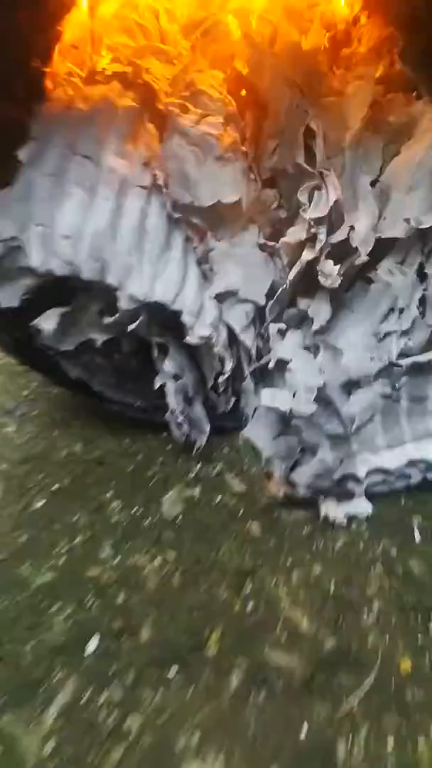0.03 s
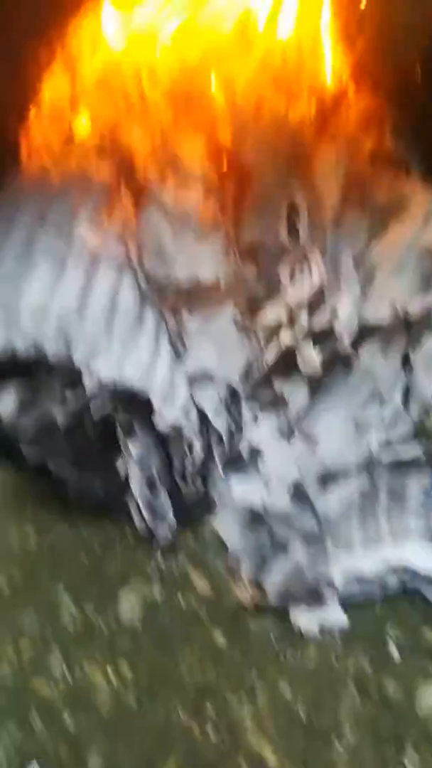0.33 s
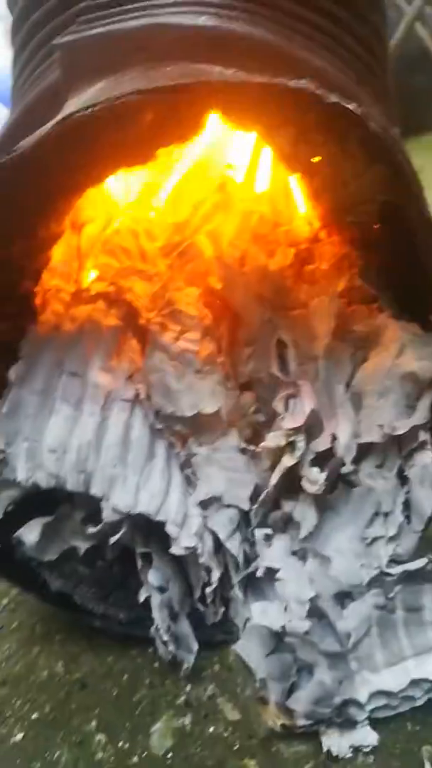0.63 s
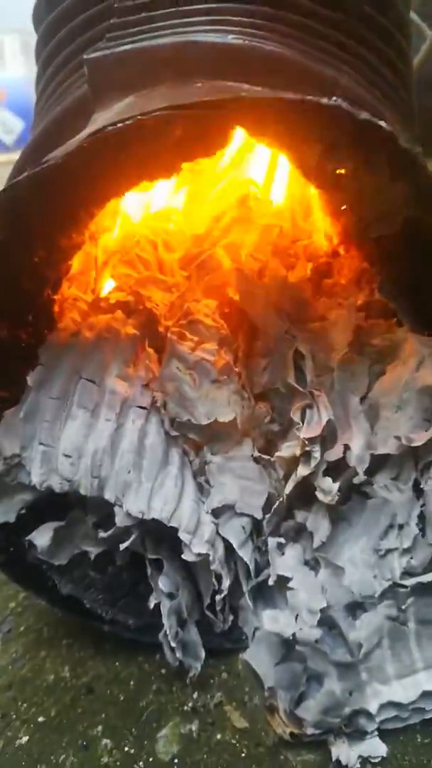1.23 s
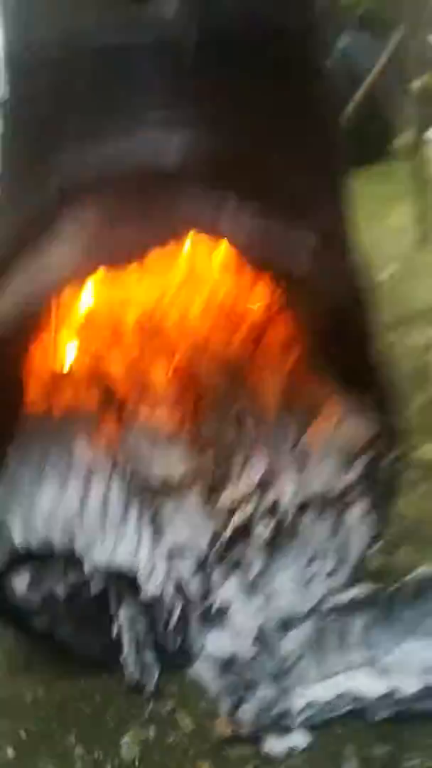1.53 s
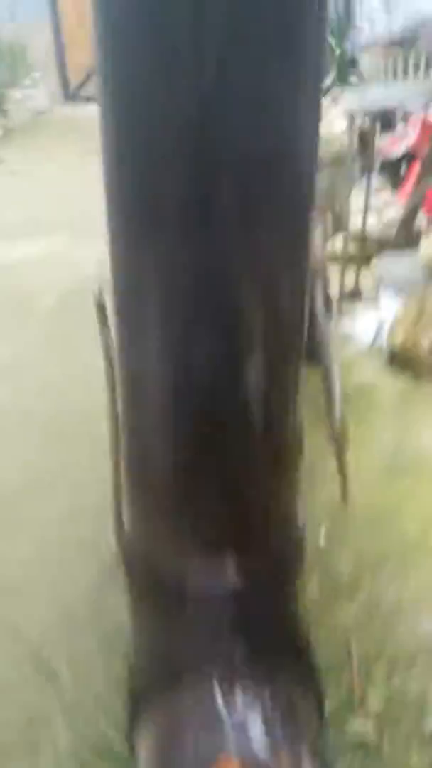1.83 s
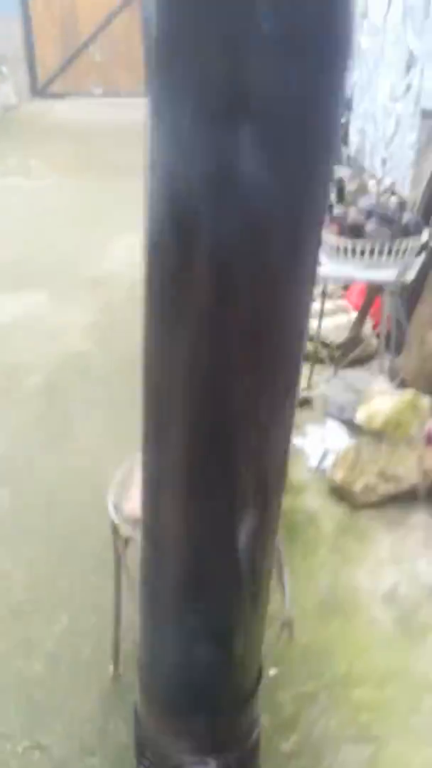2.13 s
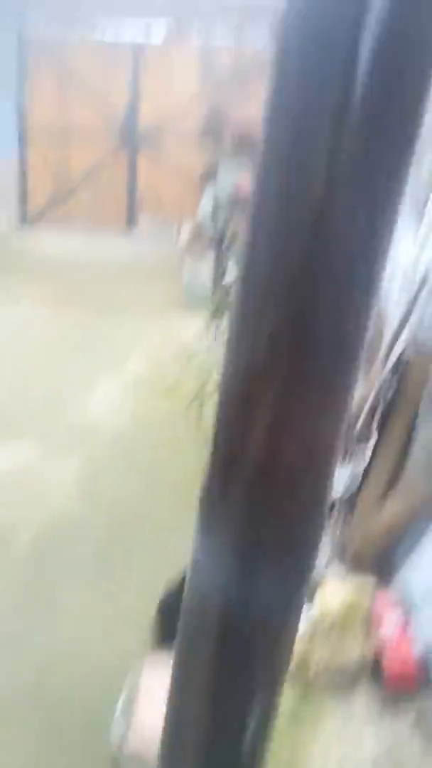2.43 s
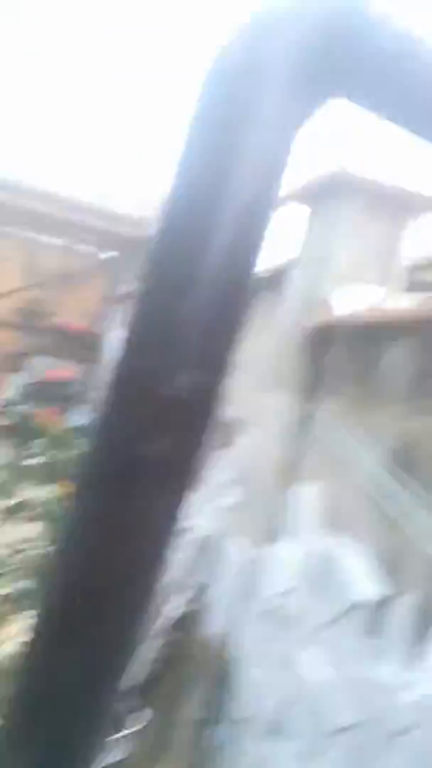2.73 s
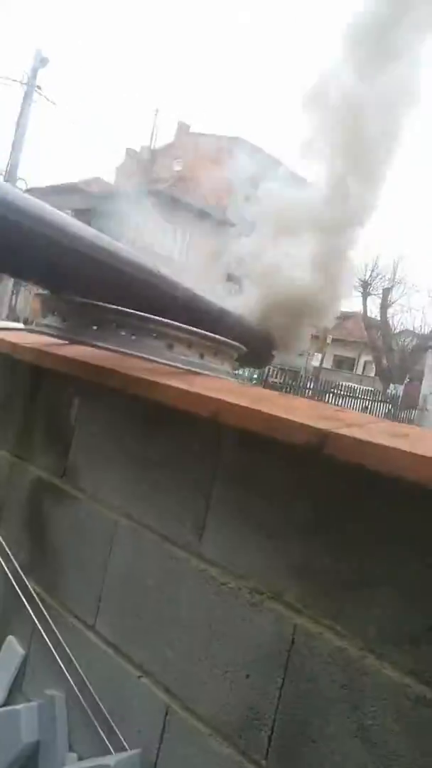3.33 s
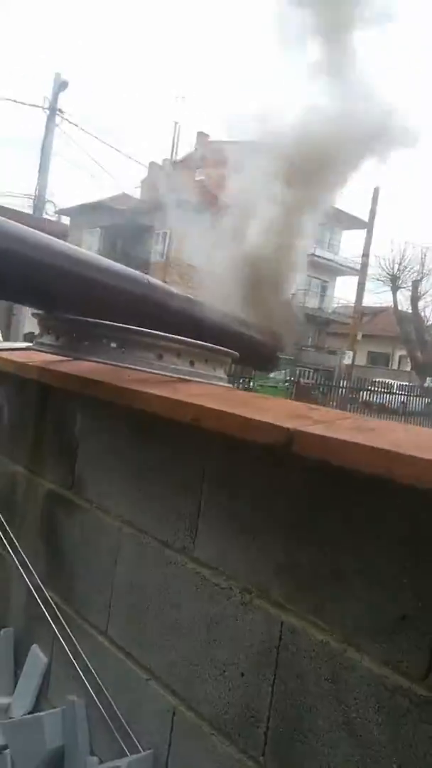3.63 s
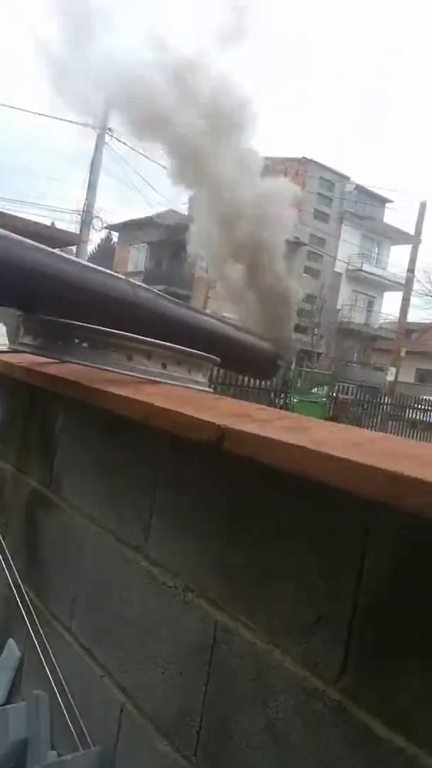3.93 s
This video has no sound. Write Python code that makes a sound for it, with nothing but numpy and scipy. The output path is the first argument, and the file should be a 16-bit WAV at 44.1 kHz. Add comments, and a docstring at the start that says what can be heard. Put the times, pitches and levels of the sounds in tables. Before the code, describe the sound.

Paper fire rumbling and crackling in a metal stovepipe outdoors, fading under clothing rustle.

```python
"""Paper burns in the mouth of a long stovepipe in a yard. The draught makes the pipe rumble in its
air modes, flames flutter and the paper crackles. A person with the microphone turns away along the
pipe, so the rumble fades; clothes rustle and a shoe scuffs the ground. A distant town lies under it.
The left microphone port is muffled and hears the fire and the movement a little late."""
import sys
import numpy as np
from scipy import signal
from scipy.io import wavfile
from scipy.ndimage import uniform_filter1d

SR = 44100
rng = np.random.default_rng(int(sys.argv[2]) if len(sys.argv) > 2 else 0)


def output_pcm(signal):
    """Save a mono or channel-first signal as 16-bit PCM at the path in sys.argv[1].

    Samples are clipped to [-1, 1] before scaling.
    """
    pcm = np.clip(np.atleast_2d(signal).T, -1, 1) * 32767
    wavfile.write(sys.argv[1], SR, np.round(pcm).astype(np.int16))


N = 176400
T = np.arange(N) / SR


def from_db(db):
    """Decibels to gain."""
    return 10 ** (np.asarray(db) / 20)


def unit_rms(x):
    """Scale to rms 1."""
    return x / np.sqrt(np.mean(x ** 2) + 1e-20)


def gain_curve(rows):
    """Gain along (seconds, dB) points."""
    return from_db(np.interp(T, *np.transpose(rows)))


def delayed(x, delay_s):
    """Fractional delay."""
    return np.interp(T - delay_s, T, x, left=0)


def drift(rate_hz):
    """Smooth random wander, rms 1."""
    step, settle = 40, 2000
    pole = np.exp(-2 * np.pi * rate_hz * step / SR)
    white = rng.standard_normal(N // step + settle + 2)
    slow = signal.lfilter([1], [1, -2 * pole, pole * pole], white)[settle:]
    return np.interp(np.arange(N) / step, np.arange(len(slow)), unit_rms(slow))


def band(x, low_hz, high_hz):
    """Butterworth band-pass."""
    edges_hz = [low_hz, min(high_hz, .45 * SR)]
    return signal.sosfilt(signal.butter(2, edges_hz, "band", fs=SR, output="sos"), x)


def resonate(x, hz, width_hz):
    """Two-pole resonance, peak gain 1."""
    r = np.exp(-np.pi * width_hz / SR)
    feedback = [1, -2 * r * np.cos(2 * np.pi * hz / SR), r * r]
    return signal.lfilter(np.array([1, 0, -1]) * (1 - r * r) / 2, feedback, x + 1e-18)


def coloured_noise(spectrum, flicker_db, flicker_hz=12):
    """Third-octave noise bands, each flickering on its own; rms 1."""
    hz, db = np.transpose(spectrum)
    edges_hz = 18 * 2 ** (np.arange(31) / 3)
    white, out = rng.standard_normal((2, N)), 0
    for k, (low, high) in enumerate(zip(edges_hz, edges_hz[1:])):
        wander_db = flicker_db * drift(flicker_hz)
        if high > hz[0] and low < hz[-1]:
            band_db = np.interp(np.log(np.sqrt(low * high)), np.log(hz), db)
            out = out + from_db(band_db + wander_db) * band(white[k % 2], low, high)
    return unit_rms(out)


def steadied(x, window_s=0.086, amount=0.55):
    """Even out part of the level swings; rms 1."""
    power = np.abs(uniform_filter1d(x * x, int(window_s * SR))) + 1e-20
    return unit_rms(x / power ** (amount / 2))


# Low rumble, and upper roar, which fades faster away from the mouth.
# Each row: time in seconds, relative level in dB.
DRAUGHT_LEVEL = [(0, -39.5), (.4, -47.5), (.95, -43), (1.7, -45), (1.79, -55), (1.9, -48), (2.2, -51.5),
                 (2.45, -52.5), (2.8, -57), (3.05, -57), (3.11, -65), (3.22, -54), (3.33, -66),
                 (3.45, -59.5), (3.7, -61.5), (4, -57.5)]
ROAR_LEVEL = [(0, -50), (.5, -54.5), (.75, -51), (1.07, -56), (1.45, -50.5), (1.65, -52.5), (1.75, -59.5),
              (1.95, -61), (2.1, -68.5), (2.45, -77.5), (2.7, -74.5), (3.35, -78), (3.65, -76), (4, -70)]
# Fire surges and sinks. Each row: centre in seconds, half length in seconds, boosts in dB for
# mode 1 with the turbulence, for mode 2, for the higher modes.
FIRE_SURGES = [(0.079, 0.015, 6, 7, 9.5), (0.118, 0.02, 7, -1, 7), (0.304, 0.052, 9, -5, 7.5),
               (0.37, 0.028, -5, -7, 4), (0.464, 0.026, 7, 9, 4), (0.619, 0.041, 1.5, 1, 4.5),
               (0.678, 0.023, 4, 7.5, 5.5), (.825, 0.018, 11.5, 6, 4.5), (0.883, 0.017, -10, 0, 6.5),
               (1.006, 0.012, -16, 9, 7), (1.126, 0.021, 3, 7.5, 8.5), (1.203, 0.028, 2.5, 1, 10.5),
               (1.228, 0.019, 6.5, -2.5, 1), (1.369, .03, 3, 2, 12), (1.528, 0.022, 3, 9.5, 7.5),
               (1.663, 0.058, 6, 2.5, -1), (2.143, 0.046, 7, -15, -1), (2.294, 0.042, 5.5, -11, 1),
               (2.418, 0.083, 0, 8, 10), (2.64, .025, 3, 0.5, -11), (3.024, 0.079, 5, -3, 2.5),
               (3.526, 0.016, 0, 17, 10), (3.951, 0.021, 8, 1, 2)]
# Each row: frequency in Hz, relative density in dB.
TURBULENCE_SPECTRUM = [(20, -4), (45, -4.5), (100, -8.5), (200, -15), (350, -21), (500, -30), (900, -47)]
# Each row: frequency in Hz, width in Hz, relative level in dB, share 0-1 that follows the roar.
AIR_MODES = [(63.66, 12.9, -2.5, 0.17), (143.2, 11.3, 1, 0.84), (220.5, 25, -1.5, 1), (298.4, 14.2, -4, 1),
             (364.7, 57, -12.5, 0.61)]


def pipe():
    """Turbulent burning drives the pipe's air modes, harder with each surge."""
    draught, roar = gain_curve(DRAUGHT_LEVEL), gain_curve(ROAR_LEVEL)
    surge_db = sum(np.outer(boosts_db, np.exp(-((T - centre_s) / half_s) ** 2))
                   for centre_s, half_s, *boosts_db in FIRE_SURGES)
    turbulence = coloured_noise(TURBULENCE_SPECTRUM, flicker_db=-1)
    out = from_db(surge_db[0] - 8.5) * draught * turbulence
    for k, (hz, width_hz, db, share) in enumerate(AIR_MODES):
        ring = resonate(rng.standard_normal(N), hz, width_hz)
        mode = steadied(resonate(ring, hz, 3.5 * width_hz))  # second pass steepens the skirts
        envelope = draught ** (1 - share) * roar ** share
        out += from_db(db + 3.5 + surge_db[min(k, 2)]) * envelope * mode
    return out


# Each row: time in seconds, relative level in dB.
FLAME_LEVEL = [(0, -59), (.1, -64.5), (.19, -58), (.45, -63), (.75, -63), (.82, -64.5), (1.04, -62.5),
               (1.11, -59.5), (1.15, -62), (1.205, -54), (1.24, -60.5), (1.28, -56.5), (1.34, -55),
               (1.38, -61.5), (1.44, -56), (1.52, -55), (1.6, -64), (1.9, -69)]
# Each row: frequency in Hz, relative density in dB.
FLAME_SPECTRUM = [(350, -14), (450, -1), (560, 0.5), (750, -2), (1100, -8), (1500, -15), (2500, -23),
                  (6000, -63)]


def flames(gain_db=8.5, flap_db=2, flap_hz=15):
    """Flames tear in quick irregular flaps, heard only near the mouth."""
    noise = coloured_noise(FLAME_SPECTRUM, flicker_db=2.5, flicker_hz=60)
    flaps = unit_rms(noise * from_db(flap_db * drift(flap_hz)))
    return from_db(gain_db) * gain_curve(FLAME_LEVEL + [(2.6, -78)]) * flaps


def ticks(per_s=120, gain_db=-12, spread_db=3):
    """Small random crackles, each at one of 12 pitches, follow the roar's level."""
    sizes = from_db(spread_db * np.minimum(rng.exponential(1, N), 4)) * rng.choice([-1, 1], N)
    impulses = sizes * (rng.random(N) < per_s / SR)
    pitch_index = rng.integers(0, 12, size=N)
    rings = sum(resonate(impulses * (pitch_index == k), hz, width_hz=hz / 3.4) * hz ** -.9
                for k, hz in enumerate(np.geomspace(750, 6000, 12)))
    return from_db(gain_db) * gain_curve(ROAR_LEVEL) * unit_rms(rings)


# Each row: time in seconds, relative level in dB.
CLOTH_BODY_LEVEL = [(0, -60.5), (.1, -56.5), (.2, -65), (.235, -55.5), (.33, -66), (.42, -66.5),
                    (.5, -74.5), (1.2, -84), (1.4, -82), (1.5, -64.5), (1.6, -59), (1.7, -55.5),
                    (1.82, -57.5), (2.02, -62.5), (2.1, -58), (2.22, -64), (2.37, -58.5), (2.48, -67),
                    (2.65, -70), (2.85, -68.5), (2.97, -74), (3.85, -76.5), (3.91, -71), (4, -64.5)]
CLOTH_TREBLE_LEVEL = [(0, -68.5), (.15, -73.5), (.3, -73.5), (.45, -76), (.55, -79.5), (1.4, -80),
                      (1.6, -70.5), (1.82, -68.5), (1.95, -76), (2.2, -76), (2.37, -69.5), (2.48, -81),
                      (2.7, -84), (3.8, -110), (4, -85)]
# Each row: frequency in Hz, relative density in dB.
CLOTH_BODY_SPECTRUM = [(300, -0.5), (600, -9), (850, -5.5), (1200, -1), (1700, -1), (2300, 1), (3800, -0.5),
                       (4600, -4.5), (6000, -22), (9000, -27)]
CLOTH_TREBLE_SPECTRUM = [(3500, -29), (5200, 2), (6400, 4), (8200, 7), (9500, -7.5), (11000, -3.5),
                         (16000, -10.5)]


def clothes(body_gain_db=6, treble_gain_db=7):
    """Fabric rubs unevenly as the person moves."""
    body = coloured_noise(CLOTH_BODY_SPECTRUM, flicker_db=3.17, flicker_hz=26)
    treble = coloured_noise(CLOTH_TREBLE_SPECTRUM, flicker_db=0.4, flicker_hz=65)
    return (from_db(body_gain_db) * gain_curve(CLOTH_BODY_LEVEL) * body
            + from_db(treble_gain_db) * gain_curve(CLOTH_TREBLE_LEVEL) * treble)


# Each row: start in seconds, level in dB, attack and decay in seconds, centre in Hz, width in octaves.
NOISE_BURSTS = [(0, -56.5, 0.0032, .14, 8070, 0.29), (.40, -57.5, 0.023, 0.016, 4800, 0.37),
                (1.56, -60, 0.32, 0.056, 5200, .6), (1.811, -38.5, 0.00064, 0.0011, 6760, 0.24),
                (2.022, -62, 0.0022, .012, 12500, 0.77), (2.080, -61, .002, .006, 14000, .3),
                (2.075, -50.5, 0.013, 0.018, 3470, 0.92), (2.100, -48, 0.012, 0.0093, 4140, 0.09),
                (2.169, -55, 0.015, 0.014, 1100, 0.37), (2.274, -49, 0.02, 0.01, 2980, 1.24),
                (2.379, -35, 0.00041, 0.0082, 518, 0.97), (2.377, -42, .002, 0.01, 240, 0.86),
                (2.379, -42.5, 0.00073, 0.012, 1720, 0.68), (2.381, -37.5, 0.00086, 0.017, 2920, 1),
                (2.378, -51, 0.0039, 0.023, 7300, 0.56), (2.496, -50.5, 0.0022, 0.019, 348, 1.65),
                (2.78, -59.5, 0.024, 0.074, 2680, 0.2), (3.881, -59, 0.019, 0.045, 785, 1.6)]


def noise_bursts():
    """Shoe scuffs, clothing swishes and a few high ticks of burning paper: short bursts of band noise."""
    out = np.zeros(N)
    for start_s, db, attack_s, decay_s, hz, octaves in NOISE_BURSTS:
        rise = np.clip((T - start_s) / attack_s, 0, 1)
        fall = np.exp(-np.maximum(T - start_s - attack_s, 0) / decay_s)
        edge_ratio = 2 ** (octaves / 2)
        noise = band(rng.standard_normal(N), hz / edge_ratio, hz * edge_ratio)
        out += from_db(db) * rise * fall * unit_rms(noise)
    return out


# Each row: frequency in Hz, width in Hz, level in dB.
DISTANT_TONES = [(502, 4.2, -80), (2940, 58, -79)]


def far_tones():
    """Faint narrow tones waver far off."""
    return sum(from_db(db) * unit_rms(resonate(rng.standard_normal(N), hz, width_hz))
               for hz, width_hz, db in DISTANT_TONES)


# Each row: frequency in Hz, relative density in dB.
YARD_SPECTRUM = [(100, 26.5), (300, 0), (500, -4.5), (1000, 2.5), (2000, -0.5), (3300, -1), (5500, -3.5),
                 (9000, -7.5), (15000, -13.5)]


def yard(level_db=-63.5):
    """Distant town and microphone hiss, independent in each channel."""
    sides = [coloured_noise(YARD_SPECTRUM, flicker_db=0.7) for _ in range(2)]
    return from_db(level_db) * np.array(sides)


# Each row: start in seconds, base level in dB, low ring in Hz, its offset in dB, middle ring in Hz,
# its offset in dB, treble offset in dB.
PAPER_SNAPS = [(0.055, -39.5, 1290, -12, 2320, -13.5, -12.5), (0.0767, -39, 970, -11, 2310, -10.5, -22),
               (0.0966, -37.5, 1610, -20, 2480, -8.5, -20), (0.1535, -41.5, 1270, -11, 2600, -19, -17),
               (0.163, -39.5, 1210, -16, 2610, -15, -15), (0.174, -34.5, 1290, -11.5, 2720, -11.5, -20),
               (0.1859, -32, 1160, -18.5, 2730, -29, -19.5), (0.3143, -37.5, 1260, -20, 2300, -15.5, -14.5),
               (0.345, -43.5, 1070, -10, 2280, -15, -14.5), (0.4923, -52, 960, -2, 2230, -10, -24),
               (0.6567, -30.5, 1350, -6.5, 2390, -14, -22.5), (0.6858, -51, 1460, -11, 2340, -18, -8.5),
               (0.7162, -48, 1320, -13, 2410, -7, -19), (0.7543, -46.5, 1020, -30, 2540, -23, -9),
               (0.8073, -58.5, 1400, 6.5, 2350, -29, -14), (0.847, -43.5, 1110, -5.5, 2520, -24, -8),
               (1.0759, -43.5, 1770, -4, 2150, -20, -23), (1.1233, -41.5, 1000, -4.5, 2540, -21, -21.5),
               (1.1614, -50.5, 960, 0.5, 2880, -36.5, -28.5), (1.1822, -47.5, 890, 2.5, 3710, -42, -33),
               (1.202, -54, 1140, -8, 2340, -31, -21), (1.3055, -37.5, 1056, -5, 2200, -11.5, -21.5),
               (1.3989, -43.5, 1120, -4, 3240, -22, -17), (1.4793, -41, 1070, -19, 3400, -28, -21),
               (1.669, -41, 1060, -31, 2530, -8, -36), (1.8099, -40, 1630, -39, 4850, -12, -9.5),
               (1.8263, -37.5, 1640, -31, 2900, -17.5, -16), (1.846, -47.5, 1600, -28, 4600, -8.5, -9),
               (2.4976, -47, 1720, -12, 3500, -12, -18), (2.8105, -47, 1270, -17, 2700, -14.5, -25),
               (2.9006, -48, 990, -18, 2470, -11.5, -26), (3.0195, -48, 1570, -12, 3800, -9.5, -19),
               (3.1368, -51.5, 1600, -12.5, 3720, -13.5, -15), (3.204, -44, 1390, -7, 2920, -13, -29)]


def crackles(treble_hz=7660, ring_q=3.4, crumble_s=0.0018, lag_s=0.000954):
    """Burning paper snaps; each snap and its trail of tiny fractures rings three resonances."""
    out, t = np.zeros(N + SR), T[:SR // 20]
    for start_s, base_db, low_hz, low_db, middle_hz, middle_db, treble_db in PAPER_SNAPS:
        snap = 0.18 * rng.standard_normal(len(t)) * np.exp(-t / crumble_s)
        snap[0] += 1
        start = int((start_s + lag_s) * SR)
        span = slice(start, start + len(t))
        for hz, db in (low_hz, low_db - 7), (middle_hz, middle_db - 4.5), (treble_hz, treble_db - 8.5):
            ring = resonate(resonate(snap, hz, hz / ring_q), hz, 0.48 * hz)
            out[span] += from_db(base_db + db) * unit_rms(ring)
        bright_tip = unit_rms(band(snap, 8900, 16500))
        out[span] += from_db(base_db + treble_db - 20.5) * bright_tip
    return out[:N]


# Each row: delay in seconds, gain in dB.
REFLECTIONS = [(.0021, -20), (.0047, -16), (0.011, -15), (.022, -20.5), (0.032, -46)]


def with_echoes(x):
    """Ground and walls reflect the sound."""
    return x + sum(from_db(db) * delayed(x, delay_s) for delay_s, db in REFLECTIONS)


def ports(x, lag_s=0.00051, muffle_hz=315, leak=0.023, diffuse_db=-23):
    """The right port is open; the left is late and muffled, with a little scattered treble."""
    dull = signal.sosfilt(signal.butter(1, muffle_hz, fs=SR, output="sos"), x)
    scatter = rng.standard_normal(SR // 200)
    smeared = signal.fftconvolve(x, scatter / np.linalg.norm(scatter))[:N]
    left = (1 - leak) * dull + leak * x + from_db(diffuse_db) * band(smeared, 1140, 14000)
    return np.array([delayed(left, lag_s), x])


def scene():
    """Fire and movement at the two ports, over the quiet yard."""
    transients = with_echoes(crackles() + ticks() + noise_bursts())
    background = yard()
    return ports(pipe() + flames() + clothes() + far_tones() + transients) + background


def record(dry):
    """Steep low-pass at 15.9 kHz."""
    return signal.sosfilt(signal.ellip(10, .1, 70, 15900, fs=SR, output="sos"), dry)


dry = scene()
out = record(dry)
output_pcm(out)
```